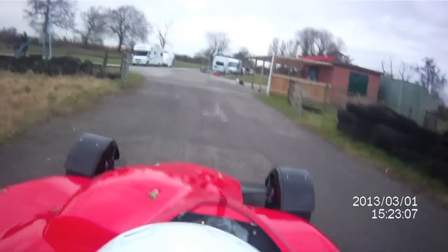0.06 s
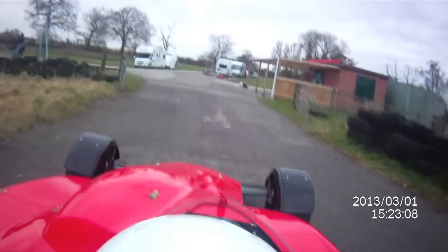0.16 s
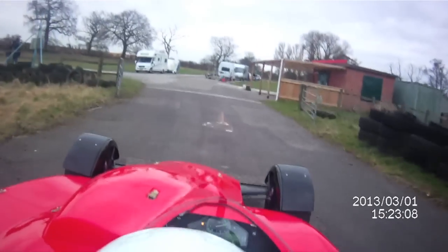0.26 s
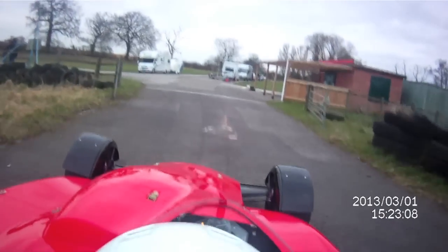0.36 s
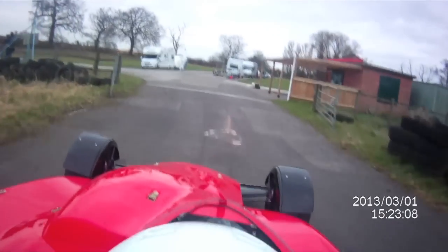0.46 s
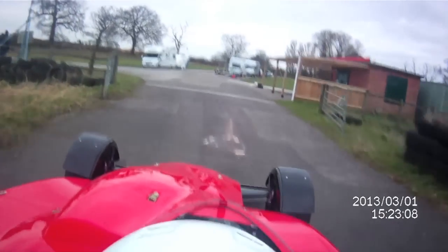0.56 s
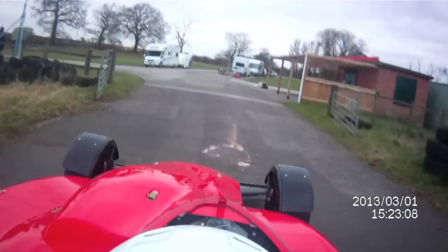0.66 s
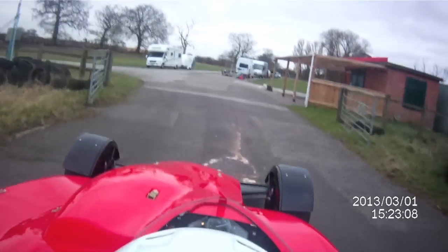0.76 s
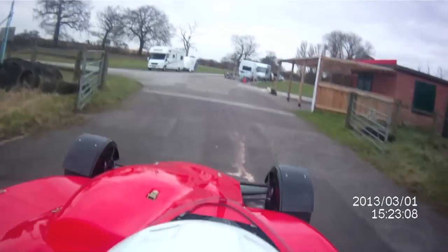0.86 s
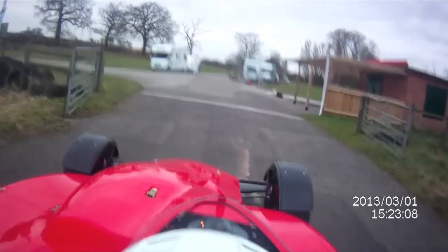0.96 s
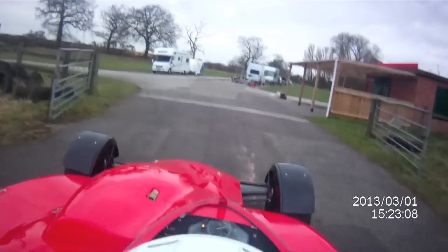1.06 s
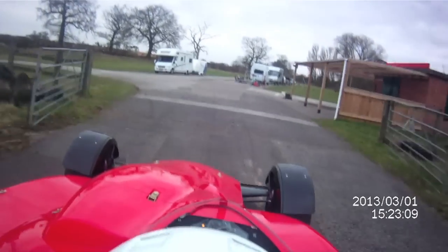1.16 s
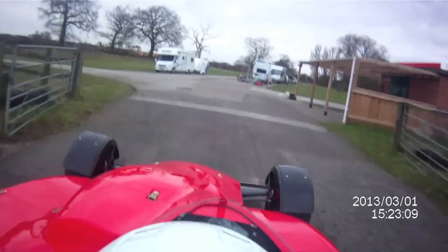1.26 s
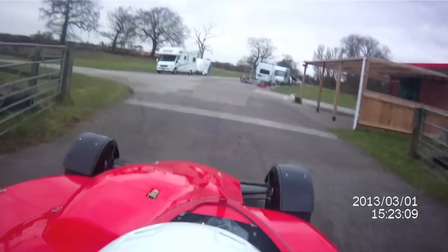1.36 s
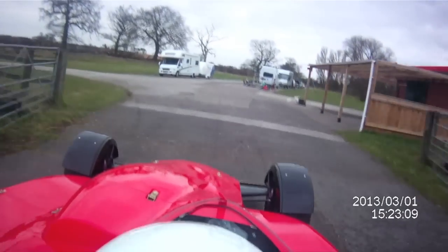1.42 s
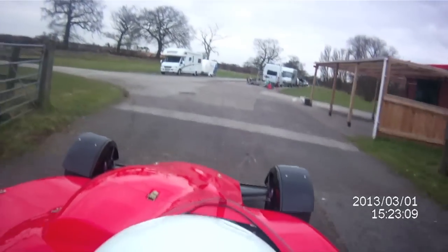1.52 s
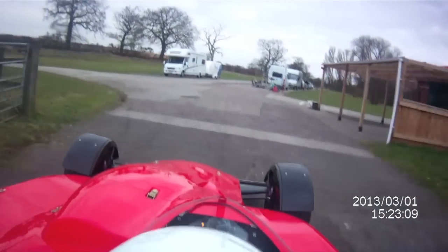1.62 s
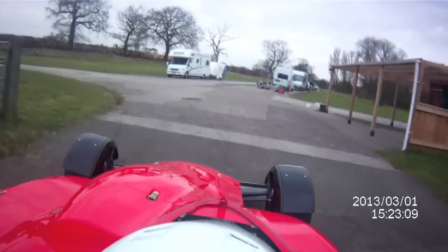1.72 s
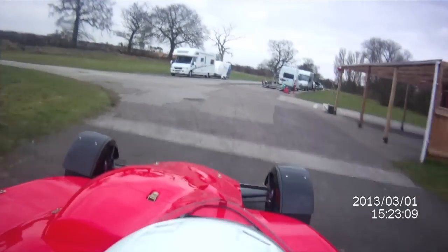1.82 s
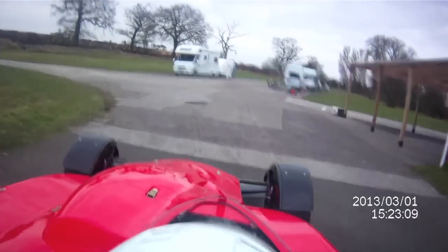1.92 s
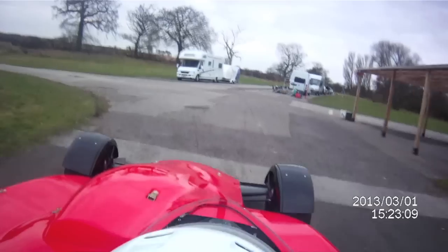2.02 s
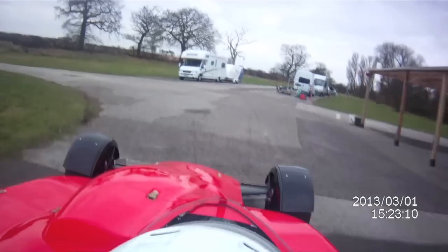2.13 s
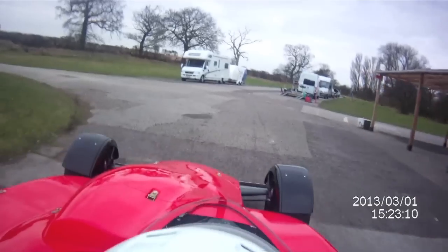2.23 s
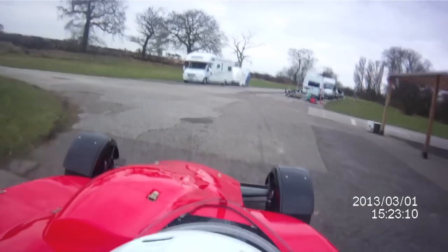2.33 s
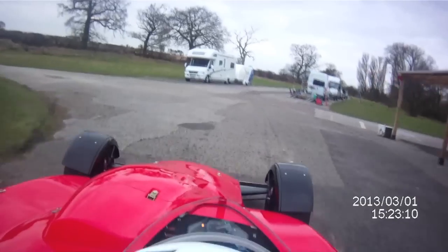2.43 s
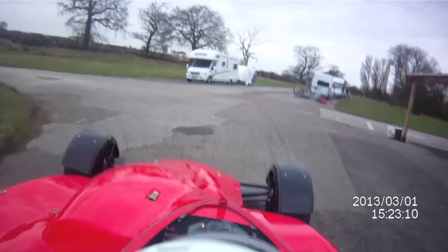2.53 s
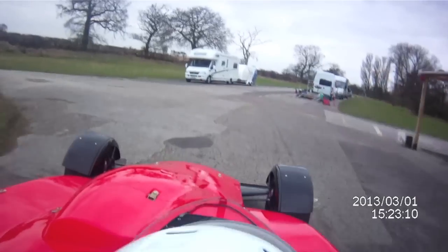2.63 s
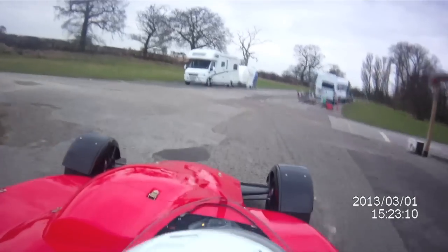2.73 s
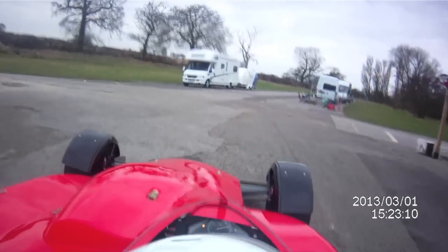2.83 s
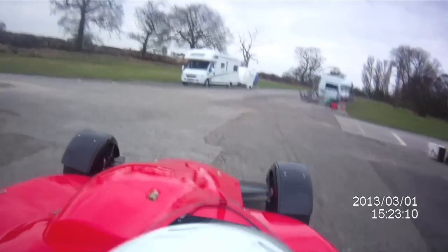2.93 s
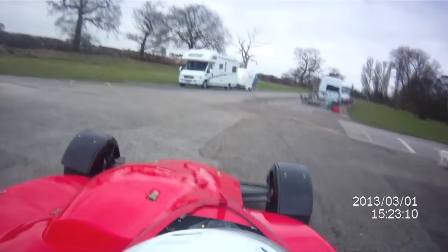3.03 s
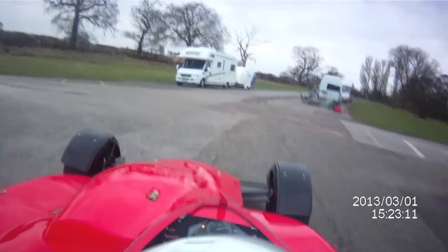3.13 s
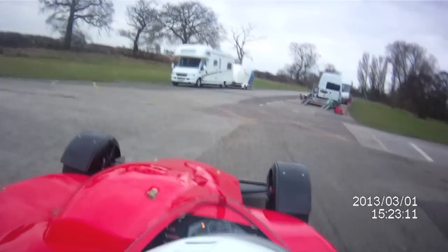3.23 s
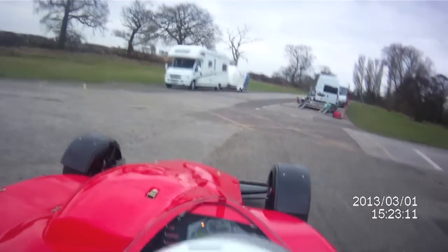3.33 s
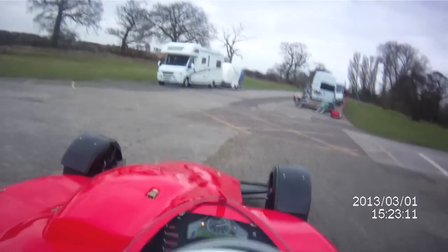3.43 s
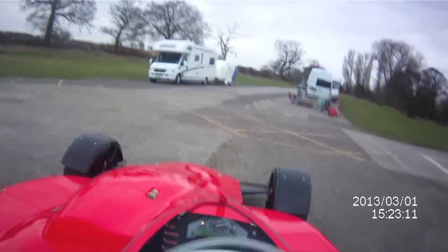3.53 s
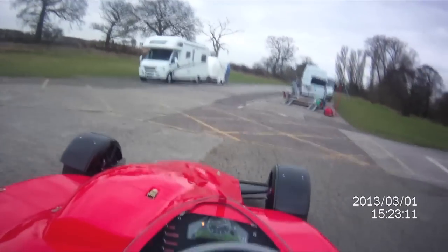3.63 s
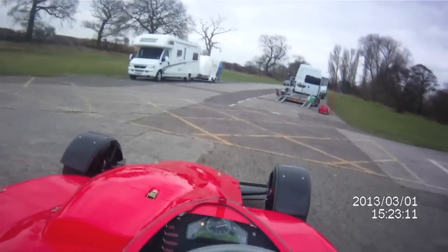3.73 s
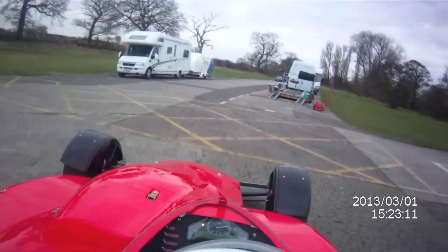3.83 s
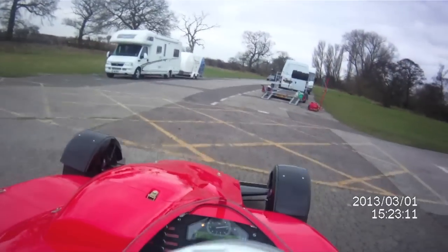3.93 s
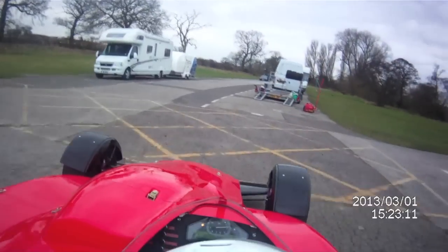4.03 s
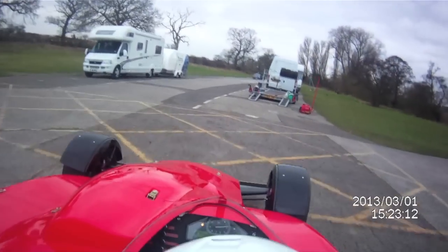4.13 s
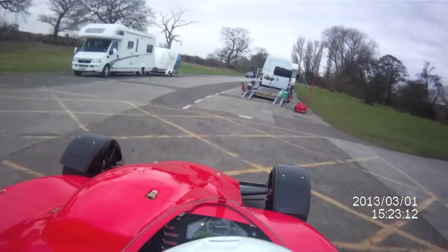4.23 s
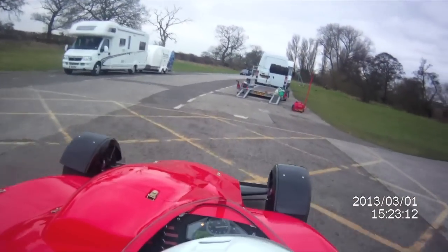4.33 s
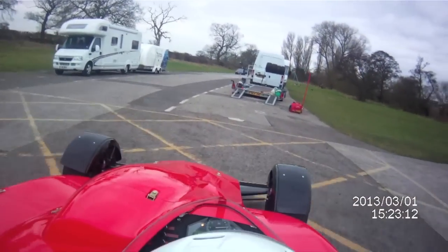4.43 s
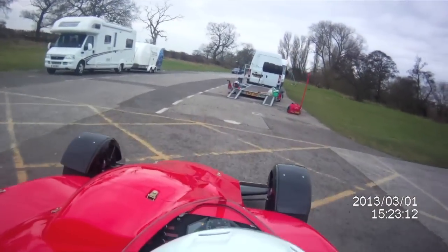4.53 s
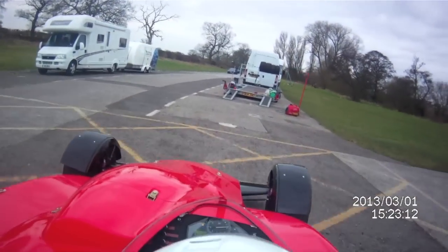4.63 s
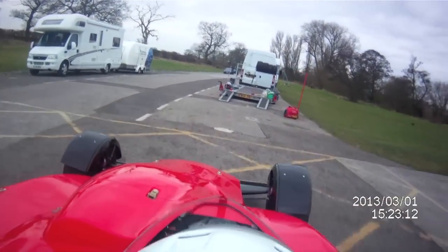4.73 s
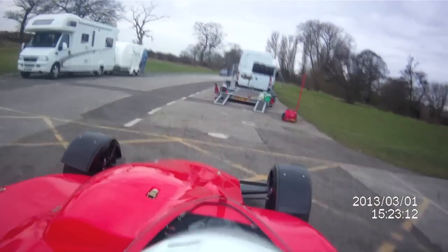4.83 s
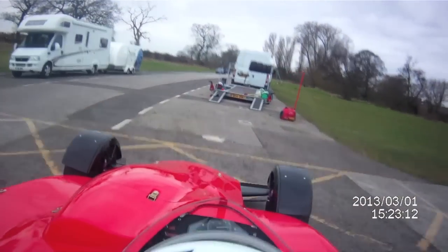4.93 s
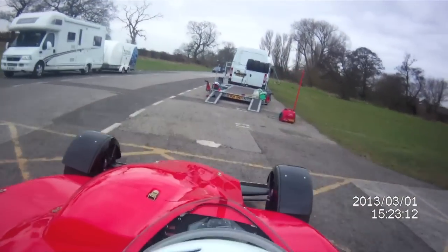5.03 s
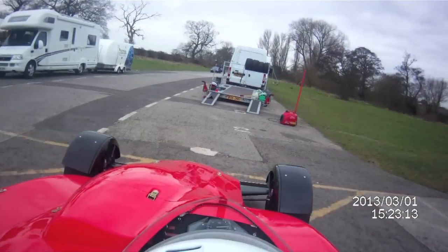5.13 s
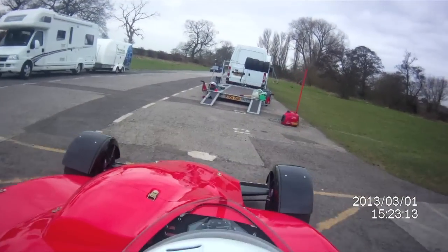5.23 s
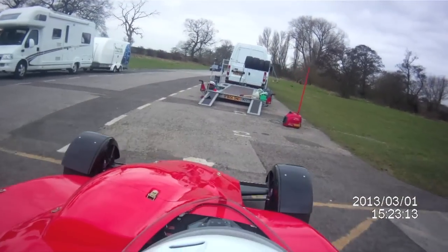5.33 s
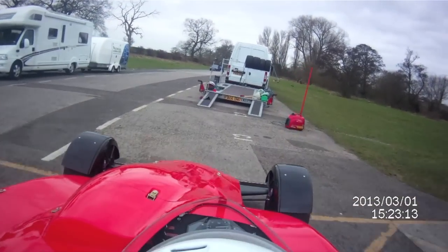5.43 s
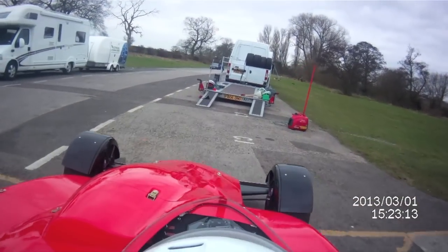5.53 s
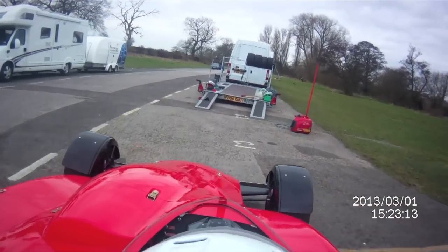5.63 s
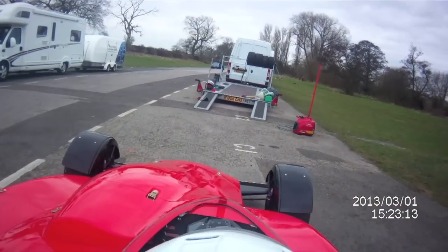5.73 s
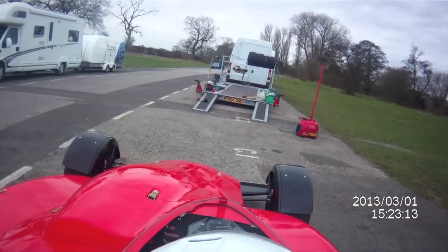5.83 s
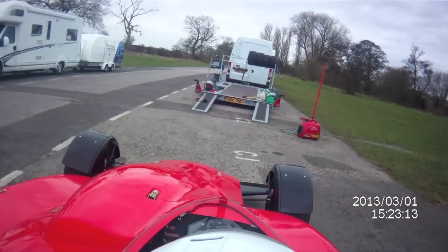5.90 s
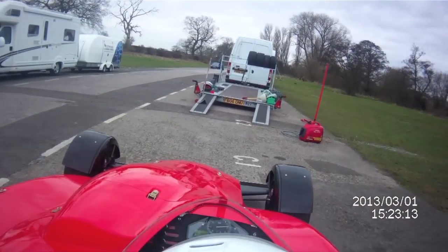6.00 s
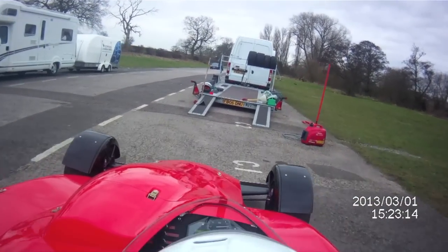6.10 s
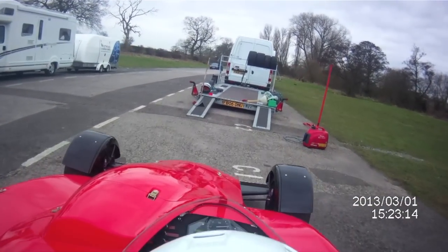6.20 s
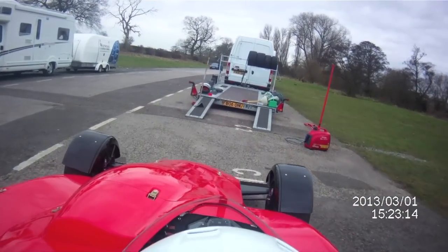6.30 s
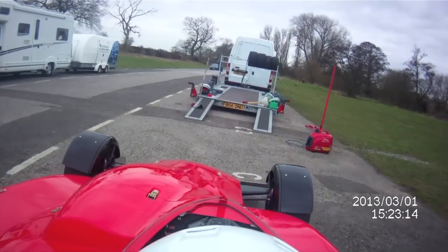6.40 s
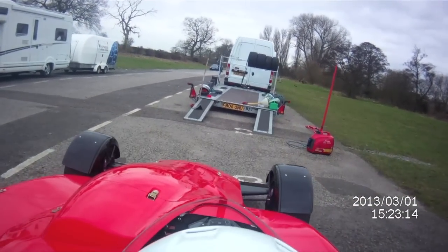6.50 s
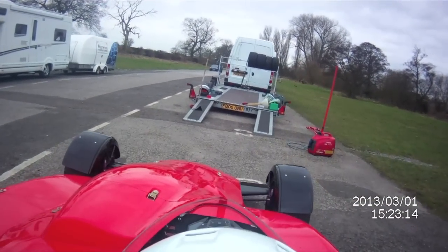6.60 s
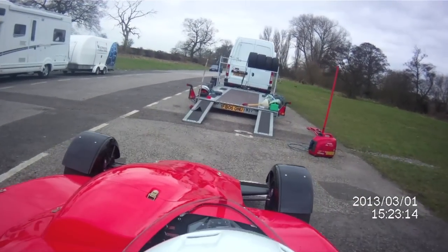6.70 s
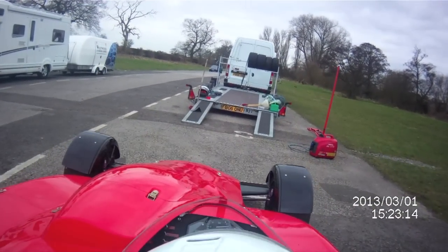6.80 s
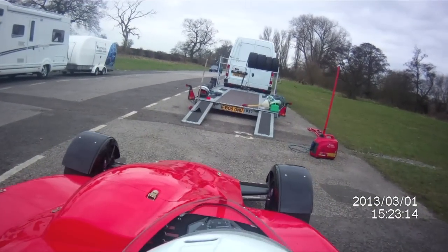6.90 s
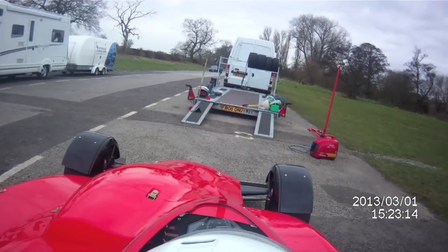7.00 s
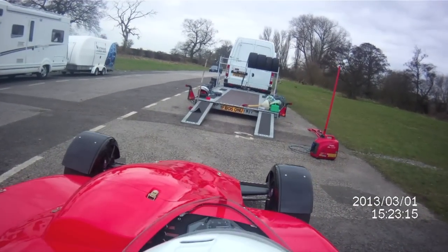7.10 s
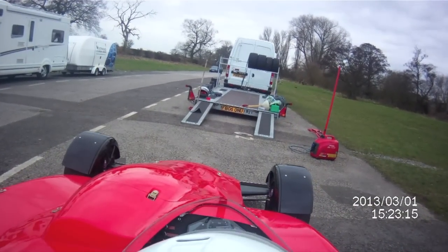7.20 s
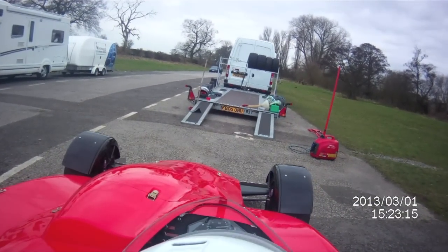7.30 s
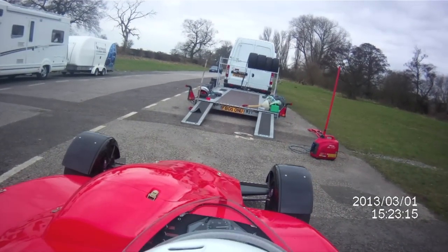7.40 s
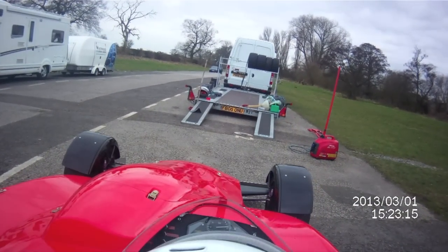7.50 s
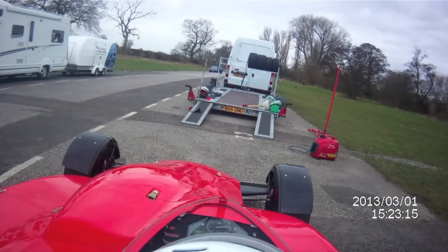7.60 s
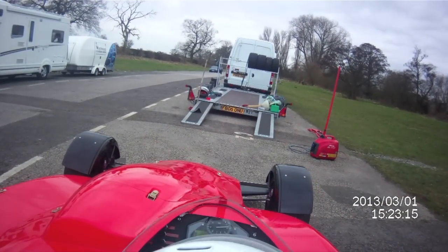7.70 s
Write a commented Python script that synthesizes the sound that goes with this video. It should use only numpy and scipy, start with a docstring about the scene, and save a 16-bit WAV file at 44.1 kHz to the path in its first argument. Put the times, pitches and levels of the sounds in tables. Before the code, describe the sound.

Outdoors in a paddock, a small camera behind the driver of an open racing car picks up a low, uneven engine burble, covered by bright metallic buzzing and loose mount rattles. Bumps thud through the bodywork. Around four seconds the throttle blips once with a turbo rush, then the engine dies. The car coasts with rapid dull clicks, grit ticks and a brake rub, slowing to near silence.

```python
"""An engine burbles just over idle: an open racing car in a paddock, heard from a small camera behind the driver.
Firing pulses and gas noise sound through body resonances over a sine boom, with gear tones and turbo rush.
Filtered noise makes the case ring and buzz, the loose mount chatter, and the tyres and bumps drum on the body.
After one blip of the throttle the engine is cut; the car coasts to rest with slowing clicks, flicked grit,
a rub of the brakes and a few last ticks, over faint hiss and hum."""
import sys
import numpy as np
from scipy import signal
from scipy.fft import rfft, irfft
from scipy.io import wavfile
from scipy.ndimage import uniform_filter1d

SR = 44100
rng = np.random.default_rng(int(sys.argv[2]) if len(sys.argv) > 2 else 0)


def file_out(sig):
    """Save sig as 16-bit WAV at sys.argv[1]."""
    # one column per channel
    cols = np.atleast_2d(sig).T
    # limit, then scale
    lim = np.clip(cols, -1, 1)
    pcm = np.round(lim * 32767).astype(np.int16)
    wavfile.write(sys.argv[1], SR, pcm)


N = 341775
T = np.arange(N) / SR  # time (s)
CUT_S = 5.05  # the engine stands still

# engine speed: time_s, firing_rate_hz
SPEED = [(0.0, 47.76), (0.79, 50.93), (2.22, 54.05), (3.58, 48.95), (3.71, 52.4), (3.84, 75.36),
         (3.89, 86.74), (4.05, 94.3), (4.3, 96.67), (4.46, 88.4), (4.9, 48.75), (5.1, 42)]
# how hard the engine works, relative: steady, a lift, one blip, then shut: time_s, effort_db
EFFORT = [(0, 0), (1.8, 0), (2.3, 2), (3.1, -0.5), (3.72, 1), (3.82, -8), (4.05, 0.5), (4.55, -2.5),
          (4.9, -17)]
# drivetrain clicks, slowing with the wheels: time_s, clicks_per_s
ROLL = [(0, 62), (4.8, 56.3), (5.3, 56.6), (5.9, 55.6), (6.6, 36.1), (7.0, 26.3), (7.4, 6.5)]
# bumps and lurches, levels before each part's trim: start_s, thud_db, shake_db, chatter_db, chatter_length_s
BUMPS = [(0.289, -13, -20.5, -11.5, 0.022), (0.991, -7.5, -24.5, -8, 0.025), (1.532, -24, -44, -8.5, 0.023),
         (2.29, -9.5, -48, -10, 0.021), (2.746, -10.5, -21, -16, 0.016), (3.692, -18, -19, -15.5, 0.022),
         (4.701, -20, -26.5, -19, 0.012), (5.092, -23, -27, -25.5, 0.008),
         (5.619, -20.5, -34, -22.5, 0.0087), (7.236, -42.5, -52, -71, 0.01),
         (7.678, -75, -62.5, -75, 0.0098)]
# resonances of the camera case, at full ring: centre_hz, width_hz, lift_db
CASE_MODES = [(1965.6, 185, 12), (2082.5, 70, 10), (2376, 71, 6.5), (2807, 180, 12), (3067, 110, 11),
              (3344, 150, 12), (3483, 150, 10), (4000, 83, 0), (4376, 120, 11), (4896, 230, 10.5),
              (5228, 400, 13), (9230, 1100, 14.5), (11340, 540, 8.5)]
# resonances of the bodywork: centre_hz, width_hz, lift_db
BODY_MODES = [(314.5, 116, 16), (410, 140, 6.5), (742, 140, 8.5), (963, 130, 11.5), (1173, 130, 7.5)]
# dull colour of drivetrain clicks and gentle mount contacts: frequency_hz, relative_db
CLICK_COLOUR = [(1200, -17), (2200, 5), (2700, -6), (3400, -1), (4300, -1.5), (5300, -7), (6000, -16.5),
                (7500, -37), (15500, -31.5)]


def undb(db):
    """Decibels to gain."""
    return 10 ** (np.asarray(db) / 20)


def curve(table):
    """Rows (time_s, value), joined by straight lines in time."""
    rows = np.array(table)
    return np.interp(T, rows[:, 0], rows[:, 1])


def unit(x):
    """Scale to rms 1."""
    return x / np.sqrt(np.mean(x ** 2))


def walk(rate):
    """Smooth chance that changes about rate times a second; rms 1."""
    hold = max(int(SR / rate), 2)
    steps = rng.standard_normal(N)[np.arange(N) // hold]
    return unit(uniform_filter1d(steps, hold))


def colour(x, points, modes=()):
    """Causal filter of unit power gain: a broad slope with ringing resonances on top."""
    size = 8192
    f = np.arange(size // 2 + 1) * SR / size
    hz, slope_db = np.transpose(points)
    db = np.interp(np.log(f + 1), np.log(hz), slope_db)
    for centre, width, lift in modes:
        db = db + lift / (1 + (2 * (f - centre) / width) ** 2)
    # folding the cepstrum gives minimum phase, so nothing rings before its blow
    cepstrum = irfft(np.log(undb(db)))
    cepstrum[1:size // 2] *= 2
    cepstrum[size // 2 + 1:] = 0
    response = irfft(np.exp(rfft(cepstrum)))
    return signal.fftconvolve(x, response / np.linalg.norm(response))[:N]


def puffs(turns, decay, scatter_db):
    """A fading puff in each cycle, every one of its own strength; decay in cycles."""
    strength = undb(scatter_db * rng.standard_normal(N).clip(-2, 2))
    fade = np.exp(-(turns % 1) / decay)
    return unit(strength[turns.astype(int)] * fade)


def impacts(spread_db):
    """A dense hail of tiny contacts of uneven strength."""
    strength = undb(spread_db * rng.standard_normal(N).clip(-2, 2))
    return unit(rng.standard_normal(N) * strength)


def blows(table, decay_s):
    """A short fading burst of noisy force at each row (start_s, level_db)."""
    force = np.zeros(N)
    for s, db, *_ in table:
        first = int(s * SR)
        age = T[first:] - T[first]
        force[first:] += undb(db) * np.exp(-age / decay_s)
    return force * rng.standard_normal(N)


def resonance(hz, centre, width):
    """Gain of a resonance for a tone that passes through it."""
    return 1 / (1 + (2 * (hz - centre) / width) ** 2)


def shake(road_db, engine_db, bump_db, steepness, rev_power):
    """Vibration level (dB) of one part: road by wheel speed, engine by effort and revs, and dying bumps."""
    cruise_hz = 57.8  # below this click rate the road shakes the car less and less
    rise_s, decay_s = 0.0091, 0.092  # the car shakes on after each bump
    road = undb(road_db) * np.minimum(curve(ROLL) / cruise_hz, 1) ** steepness
    rate = curve(SPEED)
    engine = undb(engine_db + curve(EFFORT)) * (rate / rate[0]) ** rev_power * (T < CUT_S)
    power = road ** 2 + engine ** 2
    for s, _, db, _, _ in BUMPS:
        age = np.maximum(T - s, 0)
        swell = (1 - np.exp(-age / rise_s)) * np.exp(-age / decay_s)
        power += (undb(db + bump_db) * swell) ** 2
    return 10 * np.log10(power)


def background(hiss_db=-70, hum_hz=50, hum_db=-62):
    """Faint hiss, and a low wavering hum that dies as the car stops."""
    # colour of the hiss: frequency_hz, relative_db
    hiss_colour = [(30, 4.5), (300, 2.5), (2000, 1.5), (6000, -0.5), (10000, -2.5), (15500, -17.5)]
    fade_db = np.interp(T, [6.5, 7.3, 7.6], [0, -5, -28])
    tone = np.sin(2 * np.pi * hum_hz * T + .6 * walk(13))
    hum = tone * undb(hum_db + fade_db + 5.9 * walk(8.0))
    return undb(hiss_db) * colour(rng.standard_normal(N), hiss_colour) + hum


def grit(grit_db=-8):
    """Small stones, flicked up by the coasting tyres, tick sharply against the bodywork."""
    # stones, before the common trim grit_db: start_s, level_db
    stones = [(5.0737, -29), (5.1018, -30), (5.1233, -42), (5.4246, -34), (5.8376, -31), (6.1345, -33),
              (6.2407, -34), (6.3974, -36)]
    # colour of the clicks: frequency_hz, relative_db
    stone_colour = [(1500, -15), (3500, -2), (5500, 1), (7500, -4), (12000, -10), (15500, -18)]
    return colour(blows(stones, decay_s=0.0026), stone_colour) * undb(grit_db)


def body(body_db, running, rumble_db=-1, driven_db=-4, thud_db=-6):
    """Tyres and bumps drum on the bodywork; the tyres have the whole rumble once the engine is off."""
    # broad colour of the tyre rumble: frequency_hz, relative_db
    rumble_colour = [(25, -28.5), (80, -8.5), (130, -3), (270, -1), (400, -7.5), (550, -6), (900, -13),
                     (1400, -14), (2600, -41)]
    road_db = body_db + rumble_db + driven_db * running + 2 * walk(35)
    road = impacts(spread_db=3) * undb(road_db)
    # the stiff suspension passes on a bump as a knock with little bass
    bass_cut = signal.butter(2, 230, "high", fs=SR, output="sos")
    knocks = signal.sosfilt(bass_cut, blows(BUMPS, decay_s=0.013))
    return colour(road + knocks * undb(thud_db), rumble_colour, BODY_MODES)


def gear_beat(weak_db=-9):
    """The coasting wheels drag the gears round: strong and weak scrapes in turn, ever slower."""
    turns = np.cumsum(curve(ROLL) * (1 + .03 * walk(25))) / SR
    clicks = puffs(turns, decay=.42, scatter_db=1.5)
    alternate = undb(weak_db * (turns.astype(int) % 2))
    # each scrape swells over a few milliseconds
    return unit(uniform_filter1d(clicks * alternate, size=160))


def drivetrain(coasting, panel_db, click_db=2, tick_db=-4.5, mode_share=0.97):
    """Gear clicks take over once the throttle is shut; single ticks follow as the car stops."""
    # single ticks, before the common trim tick_db: start_s, level_db
    ticks = [(6.5405, -39.5), (6.6305, -27), (6.6845, -27.5), (6.767, -31), (6.8527, -30.5), (6.996, -27.5),
             (7.3553, -41), (7.433, -30.5), (7.4759, -40), (7.5572, -48), (7.6748, -42)]
    force = coasting * gear_beat() * rng.standard_normal(N) * undb(panel_db + click_db)
    force += blows(ticks, decay_s=0.0044) * undb(tick_db)
    modes = [(hz, width, mode_share * lift) for hz, width, lift in CASE_MODES]
    return colour(force, CLICK_COLOUR, modes)


def intake(running, rush_db=-26):
    """Air rushes into the turbo, steeply louder with the revs."""
    # colour of the air drawn in: frequency_hz, relative_db
    air_colour = [(2400, -24), (3200, -12), (3500, 7.5), (3750, -2.5), (4300, -28), (8300, -44),
                  (9300, -37.5), (11500, -48), (13500, -34), (15000, -47.5)]
    revs = curve(SPEED) / np.max(curve(SPEED))
    air = colour(rng.standard_normal(N), air_colour)
    return running * revs ** 3 * undb(rush_db + 1.2 * walk(60)) * air


def gear_whine(firings, driving, flicker_db=3):
    """Gear tones follow the engine speed, wavering and broken, each loud near one casing resonance."""
    # gear tones, level before flicker: multiple_of_firing_rate, centre_hz, width_hz, level_db
    gears = [(8.5, 420, 35, -39), (17.5, 926, 70, -39)]
    tones = 0
    for order, hz, width, db in gears:
        waver = .45 * walk(14)  # phase, radians
        gain = undb(db + flicker_db * walk(18)) * resonance(order * curve(SPEED), hz, width)
        tones += np.sin(2 * np.pi * order * firings + waver) * gain
    return driving * tones


def small_rattles(firings, chance=0.65, small_db=-18, scatter_db=2, rev_fall=1.4):
    """On some crank turns the engine knocks the mount loose for a moment, most often near idle."""
    length_s = 0.0043
    rate = curve(SPEED)
    turn = (firings / 2).astype(int)  # two firings in each crank turn
    luck, size, place = rng.random((turn[-1] + 1, 3))[turn].T
    loose = luck < chance * (rate[0] / rate) ** rev_fall
    offset_s = (firings % 2 - (.5 + place)) / rate
    level = undb(small_db + scatter_db * (2 * size - 1))
    return loose * level * np.exp(-np.abs(2 * offset_s / length_s) ** 4)


def mount(firings, coasting, panel_db, rattle_db=1.2, fret_db=-6.0, fret_spread_db=5, bounce_hz=380,
          mode_share=0.44, hard_db=3, soft_db=-28):
    """The loose mount bounces a few hundred times a second in short fits."""
    # loudest rattles between bumps, before the trims hard_db and rattle_db: start_s, level_db, length_s
    rattles = [(0.018, -14.5, 0.012), (0.347, -13.5, 0.007), (0.363, -13.5, 0.0053), (0.487, -14, 0.0094),
               (0.609, -11.5, 0.0047), (0.837, -12.5, 0.01), (0.874, -12, 0.0045), (0.905, -13.5, 0.006),
               (1.129, -15, 0.0079), (1.174, -14, 0.0057), (1.234, -15.5, 0.0074), (1.368, -11.5, 0.005),
               (1.571, -13, 0.0083), (1.634, -17.5, 0.0065), (1.883, -12, 0.009), (2.134, -16, 0.0079),
               (2.631, -11, 0.0051), (2.793, -9.5, 0.0065), (2.883, -12, 0.012), (2.944, -14.5, 0.0073),
               (3.18, -14, 0.0068), (3.328, -14.5, 0.0099), (3.343, -16.5, 0.008), (3.414, -14, 0.013),
               (3.479, -14, 0.011), (3.611, -13, 0.008), (3.832, -21, 0.0055), (4.016, -13.5, 0.0065),
               (4.071, -14, 0.003), (4.086, -18, 0.003), (4.326, -17, 0.0066), (4.361, -14, 0.0047),
               (6.295, -20.5, 0.0022)]
    # colour of hard contacts: frequency_hz, relative_db
    hard_colour = [(300, -29.5), (1300, -15), (2000, 1.5), (2700, -8.5), (3500, 4), (4600, -3),
                   (5600, -4.5), (6400, -14.5), (7500, -20.5), (9500, -32.5), (11500, -22), (15500, -28)]
    # small fits come all the time while the engine drives the car, most at low revs
    fret = puffs(firings + .15 * walk(60), decay=.4, scatter_db=2)
    fret = fret * undb(fret_spread_db * walk(110).clip(-3, 1.3)) / curve(SPEED)
    fret = unit(fret) * undb(panel_db + fret_db)
    fits = (1 - coasting) * np.hypot(fret, small_rattles(firings))
    jolts = [(s, db, length) for s, _, _, db, length in BUMPS] + list(rattles)
    for start, db, length in jolts:
        middle = start + length / 2
        near = slice(max(int((middle - length) * SR), 0), int((middle + length) * SR))
        # long fits come from the hardest jolts
        peak = undb(db + hard_db * length / .015)
        fit = peak * np.exp(-np.abs(2 * (T[near] - middle) / length) ** 4)
        fits[near] = np.hypot(fits[near], fit)
    bounce_rate = bounce_hz * (1 + 0.18 * walk(300)).clip(.2, 2)
    bounces = puffs(np.cumsum(bounce_rate) / SR, decay=0.52, scatter_db=1.0)
    force = fits * undb(rattle_db) * bounces * rng.standard_normal(N)
    # hard contacts are bright, gentle ones dull; pressed against the mount, the case rings less freely
    hardness = fits / (fits + undb(soft_db))
    modes = [(hz, width, mode_share * lift) for hz, width, lift in CASE_MODES]
    hard = colour(force * hardness, hard_colour, modes)
    return hard + colour(force * (1 - hardness), CLICK_COLOUR, modes)


def camera_case(firings, coasting, case_db, panel_db, ring_db=1, buzz_db=0, throb=0.27, coast_db=-7,
                flutter_db=1.5):
    """Firings and road shake the case, which rings near 2 kHz and buzzes above."""
    # broad colours under the resonances, of ring and of buzz: frequency_hz, relative_db
    ring_colour = [(300, -23.5), (600, -14.5), (1000, -13.5), (1400, -14.5), (1650, -5), (1780, -8.5),
                   (1900, 5.5), (2300, -3), (2700, -7), (3300, -24.5), (5000, -52)]
    buzz_colour = [(1500, -21), (2400, 1), (3000, -2), (3500, 4.5), (4500, -2), (5400, -5.5), (5900, -6),
                   (6400, -22.5), (7500, -25.5), (10300, -31), (13300, -31.5), (15500, -29.5)]
    beat = puffs(firings, decay=1.0, scatter_db=1.0) - 1.5
    jolts = unit(0.5 + throb * (1 - coasting) * beat)
    ring = impacts(spread_db=4.5) * jolts * undb(case_db + ring_db + 0.81 * walk(90))
    # the buzz is loud and restless under drive, soft and even when coasting
    drive_db = coast_db * coasting + flutter_db * (2 - coasting) * walk(120).clip(-2, 2)
    buzz = impacts(spread_db=3.5) * jolts * undb(panel_db + buzz_db + drive_db)
    return colour(ring, ring_colour, BODY_MODES + CASE_MODES) + colour(buzz, buzz_colour, CASE_MODES)


def exhaust(firings, running, body_db, boom_db=-1, burble_db=-7, gas_db=-6, half_db=-7.5, scatter_db=3):
    """A deep boom at the firing rate; uneven cylinders and their gas burble through the bodywork."""
    # relative strength of the four cylinders: level_db
    cylinder_db = [-3.1, -1, 0.5, -1.5]
    # broad colour of the burble: frequency_hz, relative_db
    burble_colour = [(60, -34.5), (120, -21), (200, -11), (370, -0.5), (550, -17), (1000, -9), (1600, -21),
                     (3000, -45.5)]
    # pipe resonances that boom when the firing rate meets them, before trims: centre_hz, width_hz, level_db
    pipe_modes = [(47.8, 13, -36.5), (94, 30, -42)]
    boom_follows = 0.18  # dB of boom for each dB of effort
    cycle = firings.astype(int)
    own_db = np.array(cylinder_db)[cycle % len(cylinder_db)]
    strength = undb(own_db + scatter_db * rng.standard_normal(N)[cycle])
    rate = curve(SPEED)
    revs = rate / np.max(rate)
    # the beats are distinct near idle and merge into a rush at higher revs
    pulses = unit(np.diff(cycle, prepend=0) * strength / revs ** 2) * undb(burble_db)
    gas = puffs(firings, decay=0.89, scatter_db=4.5) * rng.standard_normal(N) * undb(gas_db)
    burble = colour(pulses + gas, burble_colour, BODY_MODES) * undb(body_db)
    boom = np.sin(2 * np.pi * firings + .2 * walk(23))
    boom += undb(-8.5) * revs ** 4 * np.sin(2 * np.pi * 2 * firings)
    # at higher revs the whole block also rocks once a crank turn
    boom += undb(half_db) * np.sin(np.pi * firings) * revs ** 3
    pipe = sum(undb(db) * resonance(rate, hz, width) for hz, width, db in pipe_modes)
    boom_level = undb(boom_db + boom_follows * curve(EFFORT) + 1.6 * walk(25))
    return running * (burble + unit(boom) * pipe * boom_level)


def scene():
    """The engine drives the car, then runs down and stops; road and mount go on until the car stands."""
    firings = np.cumsum(curve(SPEED)) / SR
    running = np.clip((CUT_S - T) / 0.056 + .5, 0, 1)
    coasting = np.interp(T, [4.55, 4.8], [0, 1])
    # the brakes come on and add to the rumble
    brake_s, brake_rise_s, brake_db = 5.88, 0.34, 11
    braking = np.clip((T - brake_s) / brake_rise_s, 0, 1)
    body_db = shake(road_db=-42.5 + brake_db * braking, engine_db=-35.5, bump_db=-4.5,
                    steepness=3.15, rev_power=0.3)
    case_db = shake(road_db=-29, engine_db=-20, bump_db=-3, steepness=4.17, rev_power=-0.12)
    panel_db = shake(road_db=-36, engine_db=-25, bump_db=-3.5, steepness=3.23, rev_power=0.35)
    rolling = grit() + body(body_db, running) + drivetrain(coasting, panel_db)
    camera = mount(firings, coasting, panel_db) + camera_case(firings, coasting, case_db, panel_db)
    engine = intake(running) + gear_whine(firings, 1 - coasting) + exhaust(firings, running, body_db)
    return (background() + rolling + camera + engine)[None]


def record(dry):
    """The camera microphone overloads on the hardest rattles; the top is cut."""
    clip_drive, top_hz = 1.08, 15400
    clipped = dry / (1 + np.abs(clip_drive * dry) ** 6) ** (1 / 6)
    top_cut = signal.ellip(8, .2, 60, top_hz, fs=SR, output="sos")
    return signal.sosfilt(top_cut, clipped)


dry = scene()
out = record(dry)
file_out(out)
```